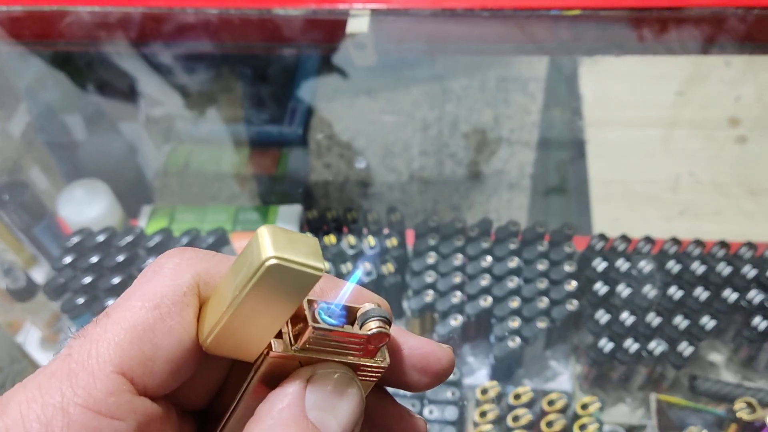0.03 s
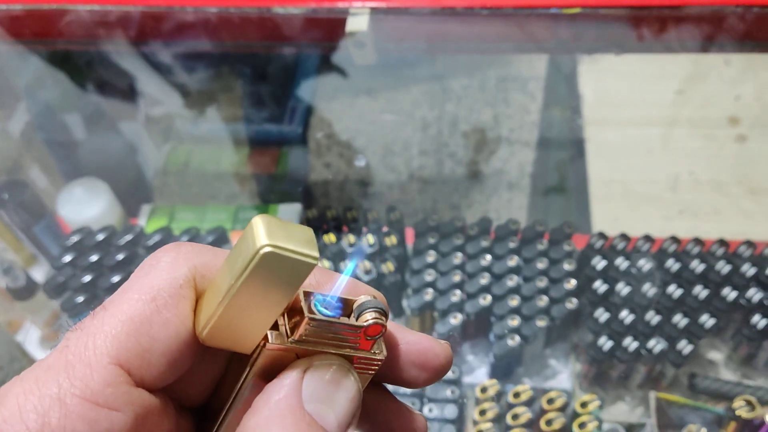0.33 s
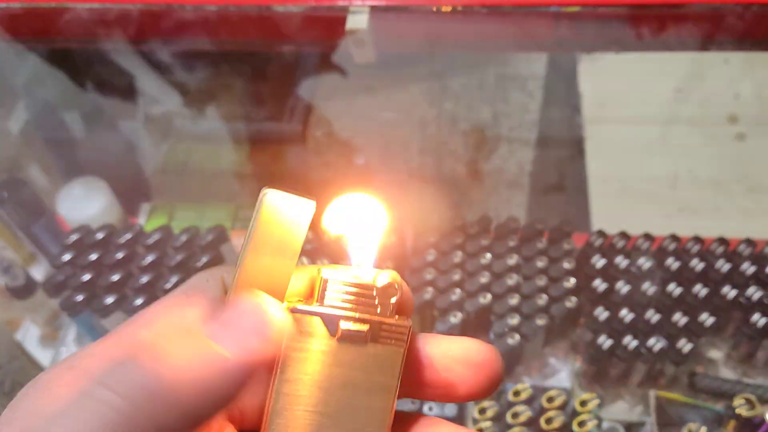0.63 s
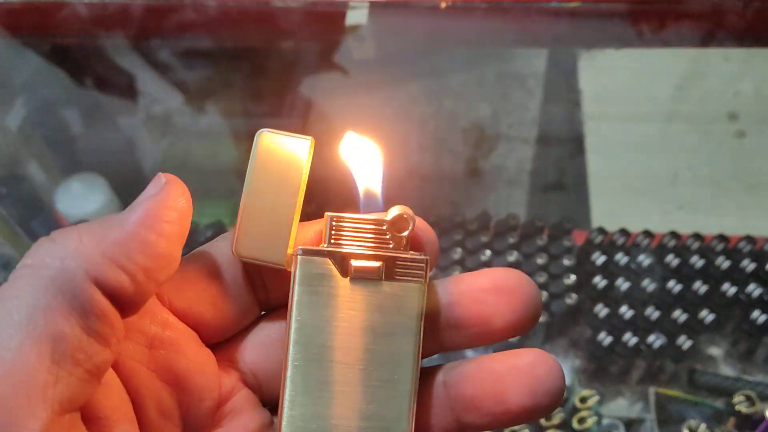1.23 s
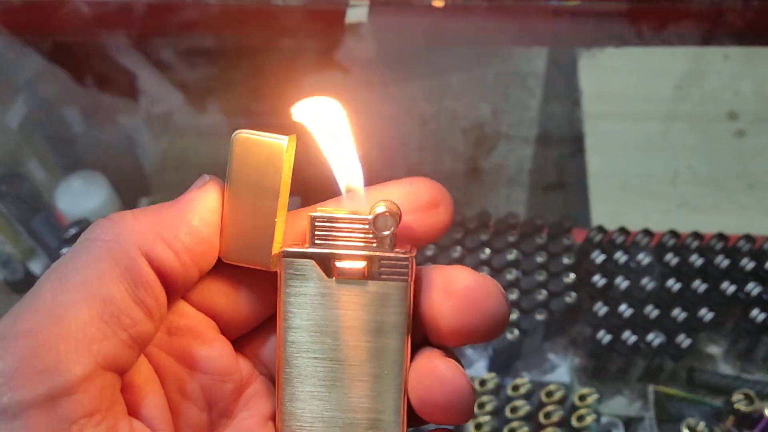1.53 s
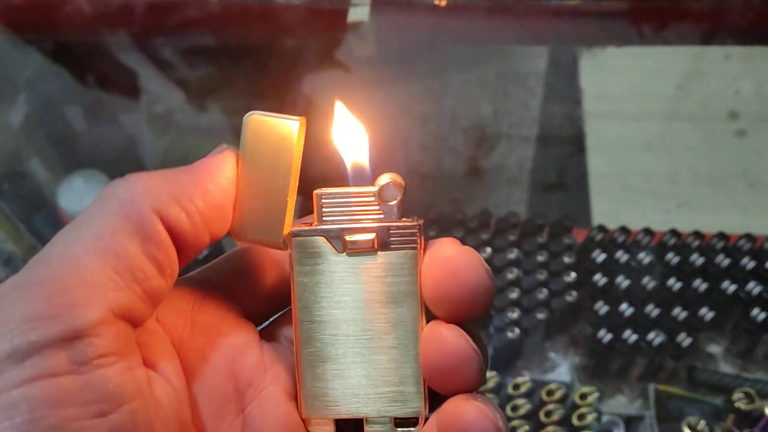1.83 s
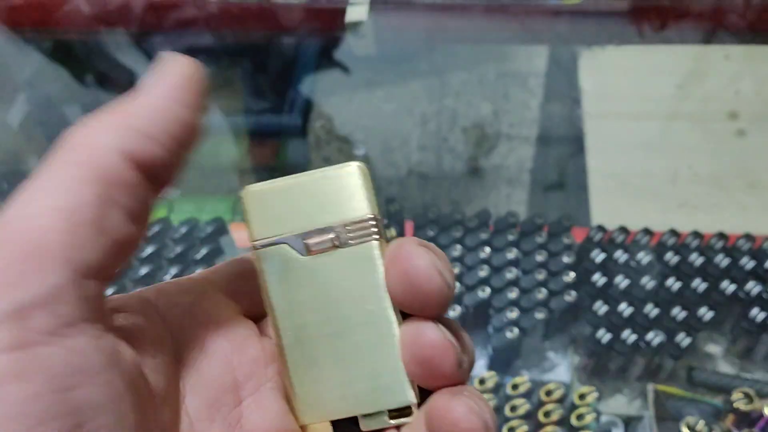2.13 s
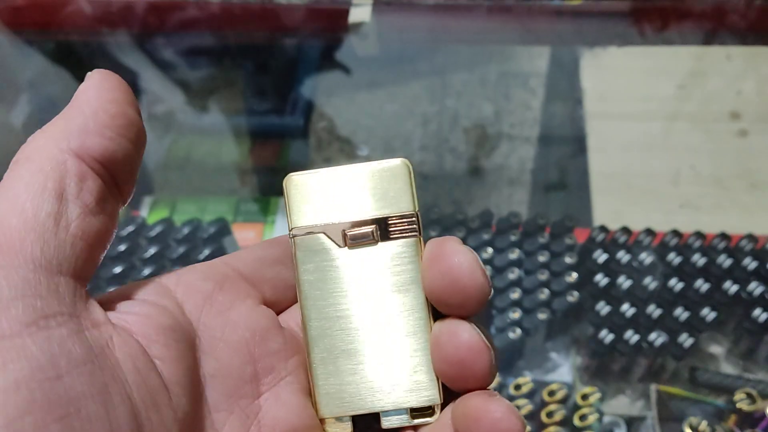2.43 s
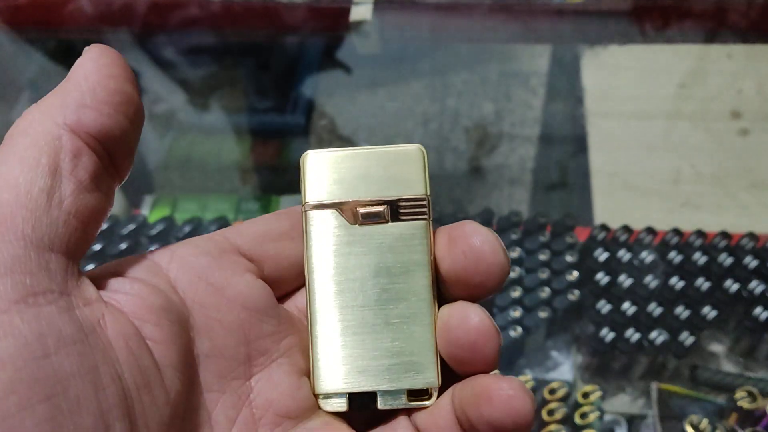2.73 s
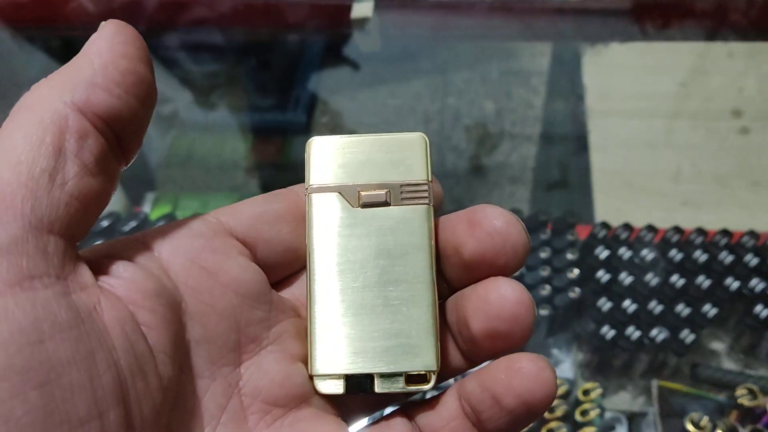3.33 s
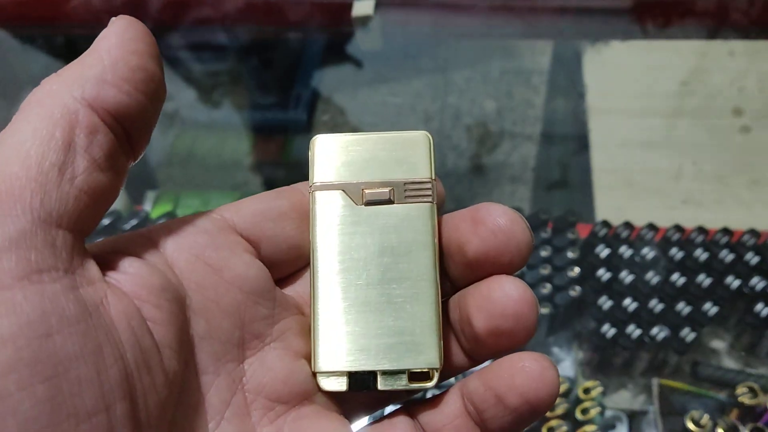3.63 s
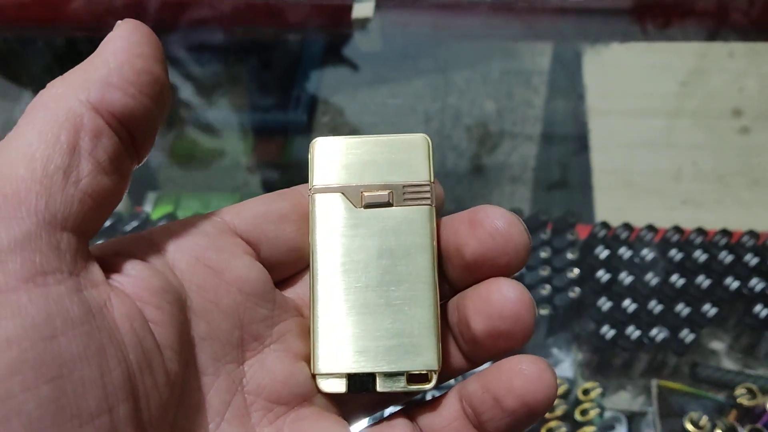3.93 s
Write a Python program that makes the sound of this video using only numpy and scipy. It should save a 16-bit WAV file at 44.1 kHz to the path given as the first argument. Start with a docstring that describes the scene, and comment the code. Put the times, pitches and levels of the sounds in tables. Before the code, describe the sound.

A brass flip-top lighter snaps shut at about 2 seconds: one loud, close metallic click with a puff of air on the microphone and a short room echo. Faint handling ticks precede it at 0.6 and 1.4 seconds. Soft hiss, street rumble and an engine throbbing through the wall run throughout. A second engine accelerates from 2.3 seconds, and the hiss swells with a faint whistle around 3.6.

```python
"""A few light ticks, then the lid of a brass flip-top lighter snaps shut, close up in a small room.
Each contact of the lid cracks and rings the case; the lid puffs air at the microphone, and a limiter
ducks everything for a tenth of a second. Through the wall an engine throbs, its firings ringing in the
exhaust as it slowly gains speed. A second engine accelerates over street rumble; hiss lies over it all."""
import sys
import numpy as np
from scipy import signal
from scipy.fft import rfft, irfft, next_fast_len
from scipy.io import wavfile
from scipy.ndimage import uniform_filter1d, minimum_filter1d, map_coordinates

SR = 44100
rng = np.random.default_rng(int(sys.argv[2]) if len(sys.argv) > 2 else 0)


def dump(signal):
    """Clip the signal to [-1, 1] and save it as 16-bit WAV at the path in sys.argv[1]."""
    limited = np.clip(np.atleast_2d(signal).T, -1, 1)
    pcm = np.round(limited * 32767).astype(np.int16)
    wavfile.write(sys.argv[1], SR, pcm)


N = 176400

# Contacts of the closing lid. Each row: start in seconds, relative level in dB, left minus right in dB.
LID_CONTACTS = [(2.0543, 8.5, -0.5), (2.0553, 9, -8), (2.0567, 0, -7), (2.066, -20, 3), (2.0696, -8, 5),
                (2.0725, -7.5, 12)]


def lid():
    """Each contact of the lid cracks and rings the brass case; returns cracks and rings apart."""
    # Case modes. Each row: pitch in Hz, relative level in dB, t60 in seconds, left minus right in dB.
    brass_modes = [(2850, -8.5, .012, 8), (4150, -20, .01, 0), (5254, -8, .014, 2), (7250, -7, .011, -7),
                   (7973, -7, .011, -9), (8800, -4, .009, -6), (10500, -1, .009, 10), (11250, -8, .025, 2),
                   (12400, -12, .008, 2), (13800, -9, .009, 0)]
    # Colour of the crack. Each row: frequency in Hz, relative level in dB.
    crack_colour = [(200, -30), (900, -25), (1900, -20), (2900, -14), (3600, -10), (5200, -7), (6500, -10),
                    (8200, -2), (9800, -2.5), (11200, 1), (12200, -4), (14000, -6), (16000, -24)]
    ring_db, attack_s = -1.5, 0.000061
    cracks, rings, t = np.zeros((2, N)), np.zeros((2, N)), np.arange(SR // 5) / SR
    for start, db, pan_db in LID_CONTACTS:
        ring = 0
        for mode_hz, mode_db, t60, side_db in brass_modes:
            decay = amp(mode_db + rng.normal(0, 1, (2, 1)) - 60 * t / t60)
            ring += pan(side_db) * decay * np.sin(2 * np.pi * (mode_hz * t + rng.random((2, 1))))
        blow = amp(db) * pan(pan_db) * (1 - np.exp(-t / attack_s))
        add(cracks, start, blow * crack(t, lambda hz: amp(along(crack_colour, hz)), t60=.009))
        add(rings, start, blow * amp(ring_db) * ring)
    return cracks, rings


def puff():
    """The lid pushes air at the right microphone port: one slow swing of pressure."""
    puff_db, swing_s, left_share = 8, 0.034, .04
    out, age = np.zeros((2, N)), np.arange(SR // 2) / SR / swing_s
    pressure = (1 - age) * np.exp(-age) * (1 - np.exp(-age / 0.022))
    add(out, LID_CONTACTS[0][0], -amp(puff_db) * np.array([[left_share], [1]]) * pressure)
    return out


def ticks():
    """The mechanism ticks in the hand: tiny, dry bursts of bright noise."""
    # Each row: start in seconds, level in dB, left minus right in dB, brightest frequency in Hz.
    touches = [(0.5573, -18, -5, 9600), (.5857, -30, -5, 7100), (0.593, -32, -7, 5600),
               (1.3511, -17.5, 23, 12140), (1.3518, -32.5, -1, 3880)]
    width_oct, skirt_db = 0.21, -21
    out, t = np.zeros((2, N)), np.arange(SR // 5) / SR
    for start, db, pan_db, bright_hz in touches:
        def colour(hz):
            peak = np.exp(-(np.log2((hz + 1) / bright_hz) / width_oct) ** 2)
            return peak + amp(skirt_db) * (hz > 2800)
        add(out, start, amp(db) * pan(pan_db) * crack(t, colour, t60=0.0069))
    return out


def room(x):
    """The small room answers with a short, bright tail, unrelated in the two channels."""
    # Each row: frequency in Hz, t60 in seconds.
    decay_times = [(500, 0.8), (4000, 0.37), (9000, 0.3), (14000, 0.28)]
    tail_db, low_cut_hz, delay_s = -3, 3500, .004
    hz, t, spectra = signal.stft(rng.standard_normal((2, SR // 2)), SR, nperseg=256)
    colour = 1 / (1 + (low_cut_hz / (hz[:, None] + 1)) ** 2)
    decay = amp(-60 * t / along(decay_times, hz)[:, None])
    tail = signal.istft(spectra * colour * decay, SR, nperseg=256)[1]
    tail = np.pad(tail / np.linalg.norm(tail[0]), ((0, 0), (round(delay_s * SR), 0)))
    return amp(tail_db) * pan(db=9) * signal.fftconvolve(x, tail, axes=1)[:, :N]


def throbbing_engine():
    """Each firing sends a pulse and a chuff of gas down the exhaust: boom, buzz, rasp and a thin whine."""
    # Each row: time in seconds, firings per second.
    speed = [(0.0, 25.52), (0.12, 23.94), (0.3, 22.72), (0.5, 21.97), (0.75, 22.22), (1.0, 23.01),
             (1.5, 24.47), (2.0, 25.12), (2.5, 25.92), (3.0, 27.12), (3.2, 27.32), (3.65, 27.36),
             (4.0, 26.36)]
    # The exhaust through the wall. Each row: frequency in Hz, relative gain in dB.
    exhaust = [(22, -30), (45, -27), (54, -8), (62, -13), (74, -15), (97, -11), (112, -13), (130, 1),
               (157, -2), (185, -15), (215, -18), (255, -8), (305, -7), (335, -4), (356, 1), (385, -13),
               (420, -20), (450, -15), (510, -19), (550, -17), (595, -29), (645, -21), (715, -26),
               (850, -34), (1500, -65)]
    # Each row: time in seconds, boom level in dB.
    boom_track = [(0, -31.5), (.25, -33.5), (.55, -29.5), (.75, -33.5), (.93, -32), (1.15, -30),
                  (1.4, -32.5), (1.75, -27.5), (2.0, -25.5), (2.25, -24), (2.65, -25.5), (3.05, -27.5),
                  (3.35, -30.5), (3.62, -31.5), (3.85, -35), (4, -38)]
    # Each row: time in seconds, buzz level in dB, emphasised frequency in Hz.
    buzz_track = [(0, -34.5, 332), (.3, -34, 318), (.62, -39, 318), (.9, -33.5, 295), (1.2, -34.5, 290),
                  (1.5, -35, 328), (1.68, -37, 346), (1.85, -31.5, 273), (2.02, -29.5, 276),
                  (2.3, -32, 266), (2.48, -34, 262), (2.68, -30, 320), (2.95, -33, 312), (3.25, -29, 312),
                  (3.5, -32, 316), (3.75, -29.5, 297), (4, -38, 306)]
    # Each row: time in seconds, rasp level in dB, whine level in dB.
    rasp_track = [(0, -45, -63), (.65, -47.5, -57), (1.1, -48, -56), (1.5, -45, -41), (1.7, -44, -46),
                  (1.9, -51.5, -56), (2.5, -47.5, -51), (2.72, -40.5, -47.5), (3.05, -43.5, -48.5),
                  (3.3, -43, -43), (3.55, -44, -60), (4, -48, -62)]
    jitter_s, scatter_db, chuff_db, whine_order = .00008, 1.3, -19, 26
    (rate,), (boom_db,) = curves(speed), curves(boom_track)
    (buzz_db, buzz_hz), (rasp_db, whine_db) = curves(buzz_track), curves(rasp_track)
    cycles = np.cumsum(rate) / SR - .36  # a firing on every whole number
    firings = np.flatnonzero(np.diff(np.floor(cycles)))
    slip, strength = rng.standard_normal((len(firings), 2)).T
    firings = np.clip(firings + jitter_s * SR * slip, 0, N - 1).astype(int)
    pulses = unit(np.bincount(firings, amp(scatter_db * strength), N))
    chuff = unit(rng.standard_normal(N) * np.exp(-(cycles % 1) / 3.2))
    pipe = filtered(pulses + amp(chuff_db) * chuff, lambda hz: causal(amp(along(exhaust, hz))))
    boom, upper = split(pipe, edge_hz=215)
    buzz, rasp = split(wall_echo(upper), edge_hz=400)
    buzz = emphasised(buzz, buzz_hz)
    whine = amp(whine_db + 2 * wobble(14)) * np.sin(2 * np.pi * whine_order * cycles + .5 * wobble(12))
    return amp(boom_db) * steady(boom) + amp(buzz_db) * steady(buzz) + amp(rasp_db) * steady(rasp) + whine


def wall_echo(x, wet_share=.85, t60=.3):
    """Walls smear the sound from one beat into the next."""
    t = np.arange(SR // 4) / SR
    tail = rng.standard_normal(len(t)) * amp(-60 * t / t60)
    return np.sqrt(1 - wet_share) * unit(x) + np.sqrt(wet_share) * unit(signal.fftconvolve(x, tail)[:N])


def accelerating_engine():
    """A second engine comes in halfway, three orders climbing with its firing rate."""
    # Each row: time in seconds, firing rate in Hz, levels of orders 1, 2 and 3 in dB.
    run_up = [(2.1, 72, -60, -60, -60), (2.3, 75.5, -37, -46, -55), (2.5, 79.3, -35, -40, -50),
              (2.75, 83.5, -35, -31, -44), (3, 88.2, -36, -32, -33), (3.25, 92.6, -37, -31.5, -35),
              (3.48, 96.4, -34, -29, -46), (3.65, 99, -36, -37, -52), (4, 104.1, -35, -37, -50)]
    return hum(run_up, waver_db=1.5)


def traffic_drone():
    """Distant traffic hums on one low, sinking note."""
    # Each row: time in seconds, pitch in Hz, level in dB.
    drone_track = [(0, 76, -48), (.6, 73, -43.5), (1.4, 73, -39), (2.1, 71, -41), (3, 68, -41),
                   (3.4, 67, -48), (4, 66, -50)]
    return hum(drone_track, waver_db=.7)


def street():
    """Engines and rumble stand to the left, so they reach that port first."""
    # Each row: frequency in Hz, relative rumble level in dB.
    rumble_colour = [(20, 1), (45, -5.5), (80, -11.5), (150, -3), (330, -7), (480, -14), (750, -24),
                     (1200, -33), (3000, -45.5)]
    # Each row: time in seconds, rumble level in dB.
    rumble_track = [(0, -36.5), (.7, -42.5), (1.2, -39.5), (1.7, -40), (2.4, -47.5), (3.1, -46.5),
                    (4, -37.5)]
    # Each row: frequency in Hz, left minus right in dB.
    balance = [(60, 2), (150, 1), (300, -2), (600, -2.5)]
    engines = throbbing_engine() + accelerating_engine() + traffic_drone()
    rumble_db, = curves(rumble_track)
    rumble = amp(rumble_db + 2.8 * wobble(5.54)) * noise(rumble_colour)
    return placed(engines + rumble, balance, lag_s=.00031)


def hiss():
    """A midrange rush and a high fizz, both flickering slightly, brighter on the left."""
    # Colours of the two bands. Each row: frequency in Hz, relative level in dB.
    rush_colour = [(200, -26), (650, 7.5), (950, 5), (1400, 0), (2200, 1.5), (2550, -0.5), (2830, -0.5),
                   (3100, -1), (3700, -2), (4500, -7), (5900, -7.5), (6800, -13), (9000, -5), (14000, -54)]
    fizz_colour = [(2000, -2.5), (6500, -4.5), (7600, -1), (9000, 0), (9700, 2.5), (10900, 4.5),
                   (12200, -1), (14000, -8), (15000, -46.5)]
    # Each row: time in seconds, rush level in dB, fizz level in dB.
    levels = [(0, -44, -47.5), (.6, -46, -47), (.95, -48.5, -47.5), (1.35, -45, -42), (1.6, -45, -44),
              (2, -43, -46), (2.3, -42.5, -45), (3, -41.5, -42), (3.3, -42, -40), (3.7, -41.5, -35.5),
              (3.85, -42, -36.5), (4, -42, -40)]
    # Each row: frequency in Hz, left minus right in dB.
    balance = [(700, 5.5), (1300, 0), (2400, 3), (4300, 5.5), (8000, -1), (11000, 13.5), (14500, 57)]
    rush_db, fizz_db = curves(levels)
    rush = amp(rush_db + 1.06 * wobble(32.23)) * noise(rush_colour)
    fizz = amp(fizz_db + 0.81 * wobble(10.0)) * noise(fizz_colour)
    return placed(rush + fizz, balance, lag_s=.00046)


def flame(centre_hz=2400, width_hz=860):
    """A narrower band of hiss swells and fades while the flame burns."""
    return swell(lambda hz: np.exp(-((hz - centre_hz) / width_hz) ** 2), db=-49.5, at_s=1.64, span_s=0.41)


def whistle(width_hz=72):
    """The hiss whistles faintly as it swells near the end."""
    # Each row: pitch in Hz, relative level in dB.
    tones = [(2830, -0.5), (3720, 0), (5900, -0.5)]
    colour = lambda hz: sum(amp(db) / (1 + ((hz - pitch) / width_hz) ** 2) for pitch, db in tones)
    return swell(colour, db=-46.8, at_s=3.64, span_s=.4)


def crack(t, colour, t60):
    """A burst of coloured noise that dies at once."""
    return unit(filtered(rng.standard_normal((2, len(t))), colour)) * amp(-60 * t / t60)


def hum(track, waver_db):
    """The first orders of an engine on one speed curve, each wavering in level."""
    hz, *levels_db = curves(track)
    phase = 2 * np.pi * np.cumsum(hz) / SR
    orders = (amp(db + waver_db * wobble(3.82)) * np.sin(order * phase + rng.uniform(0, 2 * np.pi))
              for order, db in enumerate(levels_db, 1))
    return np.sqrt(2) * sum(orders)


def swell(colour, db, at_s, span_s):
    """Coloured noise that rises and falls on a bell curve."""
    band = filtered(rng.standard_normal((2, N)), colour)
    return amp(db) * unit(band) * np.exp(-((np.arange(N) / SR - at_s) / span_s) ** 2)


def noise(spectrum):
    """Stereo noise of rms 1, near mono in the bass."""
    # Each row: frequency in Hz, correlation of left and right.
    likeness = [(60, .92), (300, 0.78), (600, 0.27), (1500, 0.19), (12000, 0.22)]

    def response(hz):
        spread = np.arccos(np.clip(along(likeness, hz), -1, 1)) / 2
        return amp(along(spectrum, hz)) * [np.cos(spread), np.sin(spread)]
    mid, side = filtered(rng.standard_normal((2, N)), response)
    return unit(np.array([mid + side, mid - side]))


def emphasised(x, centre_hz, peak_db=10, width_hz=30):
    """x through a resonance whose centre moves."""
    hz, t, spectra = signal.stft(x, SR, nperseg=4096)
    centre = np.interp(t, np.arange(N) / SR, centre_hz)
    bell = np.exp(-((hz[:, None] - centre) / width_hz) ** 2)
    return signal.istft(spectra * amp(peak_db * bell), SR, nperseg=4096)[1][:N]


def split(x, edge_hz):
    """The parts of x below and above an edge."""
    upper = filtered(x, lambda hz: 1 / (1 + (edge_hz / (hz + 1)) ** 20))
    return x - upper, upper


def placed(x, balance, lag_s):
    """Sound panned by frequency, reaching the left port lag_s before the right."""
    lead_s = np.array([[lag_s], [-lag_s]]) / 2
    return filtered(x, lambda hz: pan(along(balance, hz)) * np.exp(2j * np.pi * hz * lead_s))


def pan(db):
    """Left and right gains, db apart, at constant total power."""
    gains = amp(np.array([[db], [-db]]).reshape(2, -1) / 2)
    return gains / np.sqrt(np.mean(gains ** 2, axis=0))


def filtered(x, response):
    """x times a complex response of frequency."""
    n = x.shape[-1]
    padded = next_fast_len(n + SR // 2)
    return irfft(rfft(x, padded) * response(np.fft.rfftfreq(padded, 1 / SR)), padded)[..., :n]


def causal(gain):
    """The minimum-phase response with this gain."""
    cepstrum = irfft(np.log(np.maximum(gain, 1e-6)))
    half = len(cepstrum) // 2
    cepstrum[1:half] *= 2
    cepstrum[half + 1:] = 0
    return np.exp(rfft(cepstrum))


def steady(x):
    """Scaled to rms 1 over every few beats."""
    power = uniform_filter1d(uniform_filter1d(x ** 2, size=5400), size=5400)
    return x / np.sqrt(np.abs(power) + 1e-12)


def unit(x):
    """Scaled to rms 1."""
    return x / np.sqrt(np.mean(x ** 2) + 1e-20)


def amp(db):
    """Decibels to gain."""
    return 10 ** (np.asarray(db) / 20)


def along(points, hz):
    """(Hz, value) points joined on a log frequency axis."""
    knots_hz, values = np.transpose(points)
    return np.interp(np.log(hz + 1), np.log(knots_hz + 1), values)


def curves(rows):
    """One value per sample for each column after the time."""
    times, *columns = np.transpose(rows)
    return [np.interp(np.arange(N) / SR, times, column) for column in columns]


def wobble(rate):
    """A smooth random curve, rate knots a second."""
    return map_coordinates(rng.standard_normal(int(N * rate / SR) + 4), [np.arange(N) * rate / SR])


def add(track, start_s, sound):
    """Mix a sound in at start_s."""
    part = track[:, round(start_s * SR):][:, :sound.shape[-1]]
    part += sound[..., :part.shape[1]]


def scene():
    """The lighter over street and hiss; the room answers mostly to the cracks."""
    cracks, rings = lid()
    handling = ticks()
    reverb = room(cracks + amp(-12) * rings + amp(-11) * handling)
    return cracks + rings + handling + reverb + puff() + street() + hiss() + flame() + whistle()


def record(dry):
    """A look-ahead limiter, deaf to slow swings, ducks, holds and lets go; then the top treble is cut."""
    ceiling_db, detector_hz, top_hz = -10, 150, 14400
    lookahead_s, hold_s, release_s = 0.01, .089, .003
    sidechain = signal.sosfilt(signal.butter(1, detector_hz, 'high', fs=SR, output='sos'), dry)
    power = np.abs(uniform_filter1d(np.mean(sidechain ** 2, axis=0), size=44))
    needed_db = np.minimum(0, ceiling_db - 10 * np.log10(power + 1e-12))
    ahead, hold = round(lookahead_s * SR), round(hold_s * SR)
    held_db = minimum_filter1d(needed_db, ahead + hold, origin=(hold - ahead) // 2)
    pole = np.exp(-1 / (release_s * SR))
    gain_db = np.minimum(held_db, signal.lfilter([1 - pole], [1, -pole], held_db))
    limited = np.clip(dry * uniform_filter1d(amp(gain_db), size=64), -1, 1)
    return filtered(limited, lambda hz: hz < top_hz)


dry = scene()
out = record(dry)
dump(out)
```